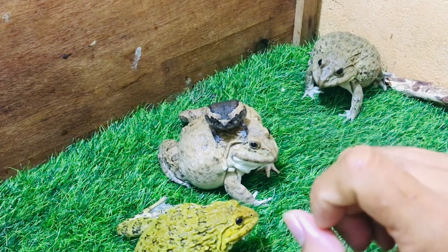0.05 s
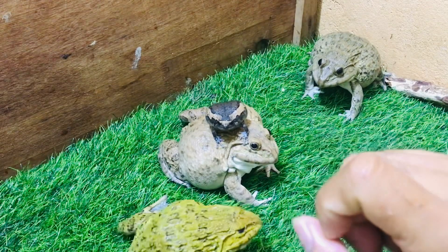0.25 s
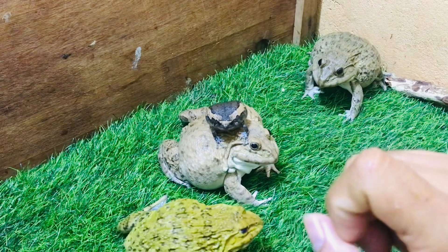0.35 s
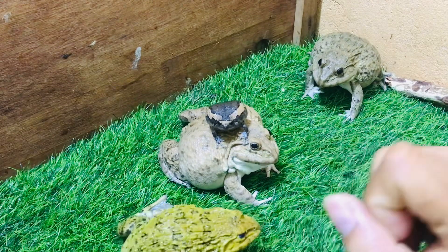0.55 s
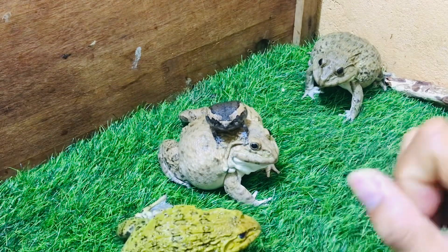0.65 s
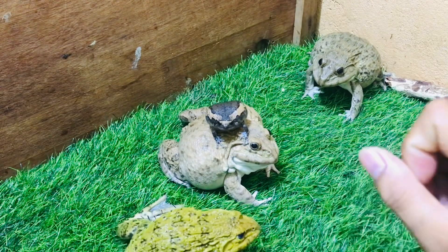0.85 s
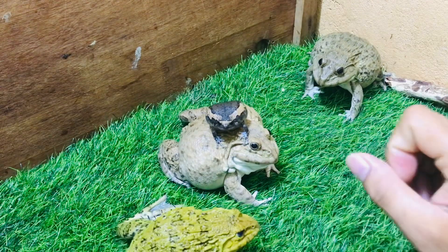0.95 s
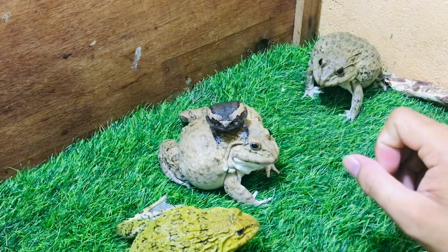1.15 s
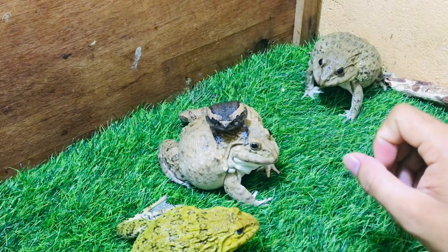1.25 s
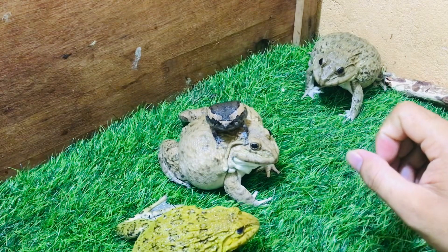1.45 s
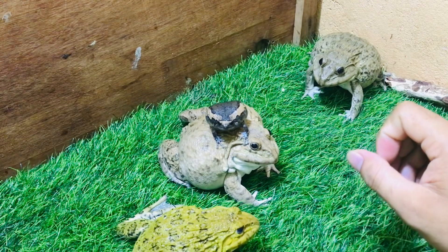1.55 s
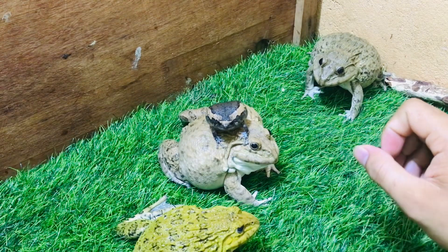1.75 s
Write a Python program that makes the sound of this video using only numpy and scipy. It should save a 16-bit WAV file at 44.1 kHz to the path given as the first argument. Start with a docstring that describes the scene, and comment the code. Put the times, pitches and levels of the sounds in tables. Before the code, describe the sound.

A frog gives one loud, close squeak at about 0.2 seconds, lasting just over a tenth of a second. Its pitch arches up and down, starting raspy, clearing, then breaking up. It rings briefly in a wooden indoor pen. A faint low hum continues throughout, with very soft rustles and thin, distant chirps from about 0.9 to 1.7 seconds.

```python
"""One loud frog squeak, close by, in a wooden pen indoors. Its pitch arches up and down while one
resonance climbs; the voice starts raspy, clears, then breaks up. Source and filter make the sound:
pulses and puffs of air excite the resonances of throat and mouth. Reflections ring briefly in pen and
room, and a limiter ducks a low hum; faint rustles and thin chirps follow."""
import sys
import numpy as np
from scipy import signal
from scipy.fft import rfft, irfft
from scipy.io import wavfile
from scipy.ndimage import uniform_filter1d, minimum_filter1d

SR = 44100
rng = np.random.default_rng(int(sys.argv[2]) if len(sys.argv) > 2 else 0)


def generate_wav(signal):
    """Clip the signal to [-1, 1] and save it as 16-bit WAV at the path in sys.argv[1]."""
    frames = np.transpose(np.atleast_2d(signal))
    scaled = np.clip(frames, -1, 1) * 32767
    pcm = np.round(scaled).astype(np.int16)
    wavfile.write(sys.argv[1], SR, pcm)


N = 79380
T = np.arange(N) / SR
EDGE_HZ = 16000  # upper limit of the harmonics and of the final low-pass


def frog():
    """Voiced source: a harmonic pulse train, roughened by jitter, subharmonics and puffs of air."""
    # arch of the squeak: time_s, pitch_hz
    pitch = [(.2165, 560), (.22, 746), (.224, 1020), (.23, 1390), (.233, 1485), (.25, 1605), (.265, 1574),
             (.275, 1506), (.29, 1436), (.305, 1322), (.314, 1190), (.322, 1060), (.329, 830), (.338, 560)]
    # force of the voice: time_s, effort_db
    effort = [(.2165, -22.5), (.2187, -13.5), (.2205, 0.5), (.228, -1.5), (.234, -2), (.25, -2), (.27, 0),
              (.29, 1.5), (.304, -1.5), (.308, -2.5), (.322, -5.5), (.331, -7.5), (.336, -22)]
    # rasp: time_s, roughness_fraction
    rasp = [(.217, .12), (.223, .2), (.228, .42), (.236, .18), (.262, .15), (.269, .38), (.29, .38),
            (.303, .26), (.311, .42), (.335, .55)]
    # soft fundamental, added after the throat: time_s, level_db
    fundamental_level = [(.2165, -43), (.219, -26), (.224, -28.5), (.23, -35), (.255, -26), (.3, -29.5),
                         (.315, -26), (.33, -34), (.338, -35), (.346, -36)]
    jitter_depth, jitter_hz, subharmonic_depth, puff_decay_cycles = .06, 900, .29, .28
    rough = curve(rasp)
    hz = uniform_filter1d(curve(pitch), size=170) * (1 + jitter_depth * rough * band(0, jitter_hz))
    started = T > effort[0][0]
    sounding = started & (T < effort[-1][0])
    cycles = np.cumsum(hz * started) / SR
    pulses = sum(np.cos(2 * np.pi * k * cycles) * (k * hz < EDGE_HZ) for k in range(2, 28))
    pulses *= np.sqrt(2 * hz / EDGE_HZ)  # about equal power at any pitch
    pulses *= 1 + subharmonic_depth * rough * np.cos(np.pi * cycles)  # alternately strong and weak
    gate = np.exp(-(cycles % 1) / puff_decay_cycles)
    puffs = gate / np.sqrt(np.mean(gate[sounding] ** 2)) * rng.standard_normal(N)
    source = (np.sqrt(1 - rough ** 2) * pulses + rough * puffs) * amp(curve(effort)) * sounding
    fundamental = amp(curve(fundamental_level)) * np.sin(2 * np.pi * cycles)
    return amp(3.5) * throat(source) + fundamental * (T < fundamental_level[-1][0])


def throat(source):
    """Vocal filter: fixed resonances colour the pulses, dispersion smears them, one formant climbs."""
    # response of throat and mouth: frequency_hz, gain_db
    response = [(200, -52), (600, -28), (1100, -20), (1700, -18), (2200, -12), (2600, -9), (3000, -1),
                (3700, -7), (4600, -2), (5300, -6), (5900, -1), (6500, -4), (8000, -1), (9400, -2),
                (10300, -13), (11600, -9), (14300, -12), (16000, -28)]
    # brightening as the mouth opens: time_s, treble_gain_db
    brightness = [(.217, -11), (.222, -8.5), (.228, 1.5), (.25, 3), (.275, -4.5), (.305, -7.5), (.315, 0.5),
                  (.335, -0.5)]
    # climbing resonance: time_s, centre_hz, gain_db
    formant = [(.22, 3000, 10), (.227, 4000, 2), (.236, 4450, 3), (.247, 4780, 13), (.267, 4720, 12),
               (.276, 6000, 7), (.285, 6900, 7), (.3, 6850, 11), (.306, 6650, 10), (.309, 8700, 7),
               (.333, 8700, 7)]
    crossover_hz, edge_delay_s = 6660, .0014
    hz = np.fft.rfftfreq(N, 1 / SR)
    dispersion = np.exp(-1j * np.pi * edge_delay_s * hz ** 2 / EDGE_HZ)  # delay grows with frequency
    spectrum = rfft(coloured(source, response)) * dispersion
    low_pass = 1 / (1 + (hz / crossover_hz) ** 8)
    treble = irfft(spectrum * (1 - low_pass), N)
    voice = irfft(spectrum * low_pass, N) + amp(curve(brightness)) * treble
    return voice + amp(curve(formant, column=2)) * resonate(voice, curve(formant), width_hz=510)


def room(x):
    """Reflection: early wall echoes, then the exponential reverberation of the pen and the room."""
    # echoes from the pen's walls: delay_s, gain_db
    walls = [(.0013, -13.5), (.0029, -16), (.0047, -16), (.0083, -22)]
    # reverberation time of the room: frequency_hz, t60_s
    decay_times = [(300, 1.04), (1500, 0.52), (3000, 0.61), (4600, 0.6963), (7000, 0.48), (10000, 0.5069),
                   (15000, 0.35)]
    # colour of the room's tail: frequency_hz, gain_db
    tail_colour = [(300, -5), (700, -1.5), (1150, 8), (1550, 9), (2000, 7.5), (2500, -3), (3100, -1.5),
                   (3600, -4), (4350, 0.5), (4800, -9.5), (5200, -2), (5900, -3), (7000, -1.5),
                   (9300, -3.5), (10500, 7), (12000, 3.5), (15000, -4)]
    pen_t60_s = .055
    echoes = sum(amp(db) * np.interp(T - delay, T, x, left=0) for delay, db in walls)
    hz, t, spectra = signal.stft(rng.standard_normal(N), SR, nperseg=256)
    decay = amp(-60 * t / at_frequency(decay_times, hz)[:, None])
    tail = signal.istft(spectra * decay, SR, nperseg=256)[1][:N]
    tail = coloured(tail / np.linalg.norm(tail), tail_colour)
    pen = rng.standard_normal(N) * amp(-60 * T / pen_t60_s)
    impulse_response = amp(-16) * tail + amp(-11.5) * pen / np.linalg.norm(pen)
    return x + echoes + signal.fftconvolve(x, impulse_response)[:N]


def rustles():
    """Random amplitude modulation turns swells of bright noise into grainy rustles."""
    # soft rustles: start_s, length_s, level_db
    events = [(0.929, 0.1, -50.5), (1.587, 0.07, -61.5), (1.638, 0.11, -48)]
    # their spectrum: frequency_hz, relative_db
    colour = [(1000, -50), (3400, -17), (5500, -23), (7200, -12.5), (8800, 3.5), (10500, -5.5),
              (13000, -13), (15500, -24)]
    envelope = sum(amp(db) * swell(start, length) for start, length, db in events)
    grain = unit_rms(amp(2.4 * band(0, 230)))
    return envelope * grain * noise(colour)


def tick():
    """A damped transient: a high noise band starts abruptly and decays exponentially."""
    start_s, decay_s = 1.434, .021
    envelope = (T > start_s) * np.exp(-abs(T - start_s) / decay_s)
    return amp(-54.5) * envelope * band(11700, 3800)


def hiss():
    """Broadband noise under one slow envelope swells before the squeak and fades after it."""
    # the swell: start_s, length_s, level_db
    event = (-0.16, 0.68, -54)
    # its spectrum: frequency_hz, relative_db
    colour = [(500, -6), (1000, -13), (2000, -9), (3500, -12.5), (6000, -17), (9500, -12), (11800, 1.5),
              (13500, -12), (16000, -16)]
    start, length, db = event
    return amp(db) * swell(start, length) * noise(colour)


def whistles():
    """Frequency modulation: thin pure tones follow parabolic arches of pitch."""
    # whistles: start_s, length_s, first_hz, middle_hz, last_hz, level_db
    events = [(0.877, 0.058, 10580, 11600, 11650, -53), (1.204, .052, 10150, 10480, 10000, -61)]
    out = np.zeros(N)
    for start, length, first, middle, last, db in events:
        arch = np.polyfit([0, .5, 1], [first, middle, last], 2)
        hz = np.polyval(arch, np.clip((T - start) / length, 0, 1))
        out += amp(db) * swell(start, length) * tone(hz)
    return out


def chirps():
    """Modulation by noise broadens gliding tones into fuzzy, distant chirps."""
    # chirps: start_s, length_s, first_hz, last_hz, level_db
    events = [(0.972, 0.083, 3160, 2970, -67.5), (1.033, .09, 3040, 2910, -68.5),
              (1.134, 0.27, 3284, 3320, -74), (1.457, .09, 3150, 3030, -66.5), (1.513, .1, 3100, 3010, -66)]
    out = np.zeros(N)
    for start, length, first, last, db in events:
        hz = np.interp(T, [start, start + length], [first, last])
        fuzzy_tone = band(0, width_hz=160) * np.sqrt(2) * tone(hz)
        out += amp(db) * swell(start, length) * fuzzy_tone
    return out


def background():
    """Stationary room noise, with a hum that wavers as the components of narrow bands beat."""
    # noise floor: frequency_hz, relative_density_db
    floor = [(20, -38.5), (32, -25.5), (42, -5), (58, 7), (80, -5), (110, -4), (160, -14), (220, -19),
             (300, -7.5), (420, -17.5), (600, -22.5), (800, -25.5), (1100, -27.5), (2500, -31.5),
             (3100, -26.5), (3700, -35), (6300, -35.5), (7100, -26), (7700, -30), (8450, -13),
             (9600, -34.5), (12000, -32.5), (15500, -40.5)]
    # hum bands: centre_hz, width_hz, level_db
    hum = [(58, 12, -62), (105.4, 14, -57.5), (274, 12, -62.5), (344, 2, -61.5), (766, 60, -77.5)]
    return amp(-54.5) * noise(floor) + sum(amp(db) * band(hz, width) for hz, width, db in hum)


def amp(db):
    """Decibels as an amplitude ratio."""
    return 10 ** (np.asarray(db) / 20)


def unit_rms(x):
    """Normalisation to unit power."""
    return x / np.sqrt(np.mean(x ** 2) + 1e-20)


def curve(points, column=1):
    """Linear interpolation of a control at every sample."""
    points = np.array(points)
    return np.interp(T, points[:, 0], points[:, column])


def at_frequency(points, hz):
    """Interpolation on a log-frequency axis."""
    frequencies, values = np.transpose(points)
    return np.interp(np.log(hz + 1), np.log(frequencies), values)


def coloured(x, points):
    """Minimum-phase filtering: a causal response with the given spectrum."""
    hz = abs(np.fft.fftfreq(4096, 1 / SR))
    log_gain = np.log(amp(at_frequency(points, hz)))
    taps = np.fft.ifft(np.exp(np.conj(signal.hilbert(log_gain)))).real
    return signal.fftconvolve(x, taps[:len(taps) // 2])[:N]


def noise(points):
    """Spectral shaping of white noise, at unit power."""
    gain = amp(at_frequency(points, np.fft.rfftfreq(N, 1 / SR)))
    return unit_rms(irfft(rfft(rng.standard_normal(N)) * gain, N))


def band(hz, width_hz):
    """Noise in a Gaussian band, at unit power; centred on zero it is a random fluctuation."""
    gain = np.exp(-2 * ((np.fft.rfftfreq(N, 1 / SR) - hz) / width_hz) ** 2)
    return unit_rms(irfft(rfft(rng.standard_normal(N)) * gain, N))


def resonate(x, hz, width_hz):
    """A damped resonator of unit gain whose centre follows hz."""
    carrier = np.exp(2j * np.pi * np.cumsum(hz) / SR)
    pole = np.exp(-np.pi * width_hz / SR)
    return 2 * (carrier * signal.lfilter([1 - pole], [1, -pole], x / carrier + 1e-18)).real


def tone(hz):
    """A sinusoid whose phase is the integral of its frequency."""
    return np.sin(2 * np.pi * np.cumsum(hz) / SR)


def swell(start, length):
    """A half-sine envelope."""
    return np.sin(np.pi * np.clip((T - start) / length, 0, 1))


def scene():
    """Superposition of the reverberant squeak and the quiet sounds around it, in one channel."""
    return (room(frog()) + background() + rustles() + tick() + hiss() + chirps() + whistles())[None]


def record(dry):
    """Dynamic range compression: gain control with hold and release, a peak limiter, then a low-pass."""
    threshold_db, hold_s, release_db_per_s, ceiling = -4.5, .19, 72, .95
    power_db = 10 * np.log10(abs(uniform_filter1d(dry[0] ** 2, size=130)) + 1e-12)
    excess_db = np.maximum(power_db - threshold_db, 0)
    hold_samples = 2 * int(hold_s * SR / 2) + 1
    held_db = -minimum_filter1d(-excess_db, hold_samples, origin=hold_samples // 2)
    release_db = T * release_db_per_s
    reduction_db = np.maximum.accumulate(held_db + release_db) - release_db
    ducked = dry / amp(uniform_filter1d(reduction_db, size=60))
    peak_gain = ceiling / np.maximum(abs(ducked[0]), ceiling)
    limited = ducked * uniform_filter1d(minimum_filter1d(peak_gain, size=121), size=101)
    low_pass = signal.firwin(511, EDGE_HZ, window=("kaiser", 9), fs=SR)
    return signal.oaconvolve(limited, low_pass[None], "same")


dry = scene()
out = record(dry)
generate_wav(out)
```